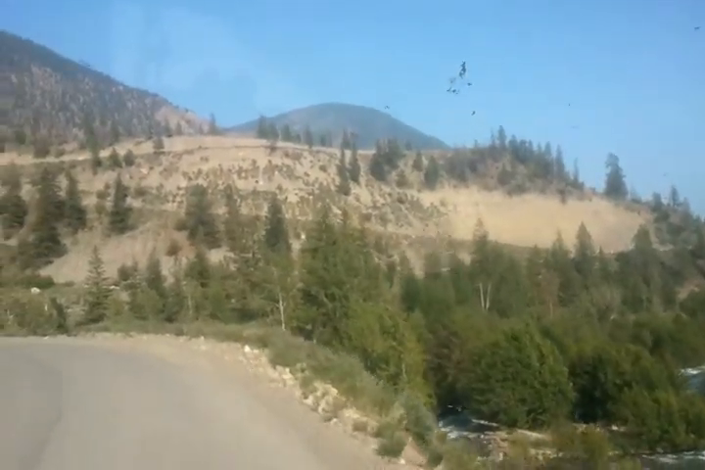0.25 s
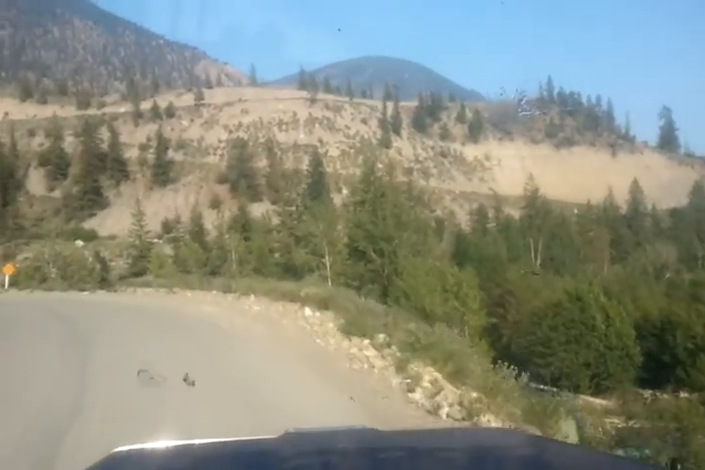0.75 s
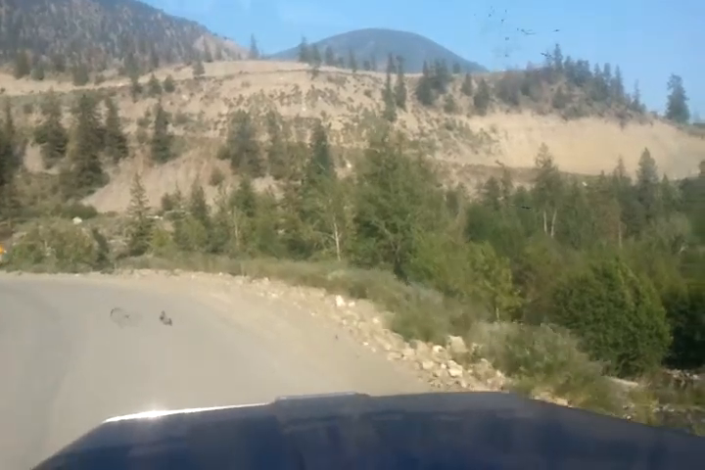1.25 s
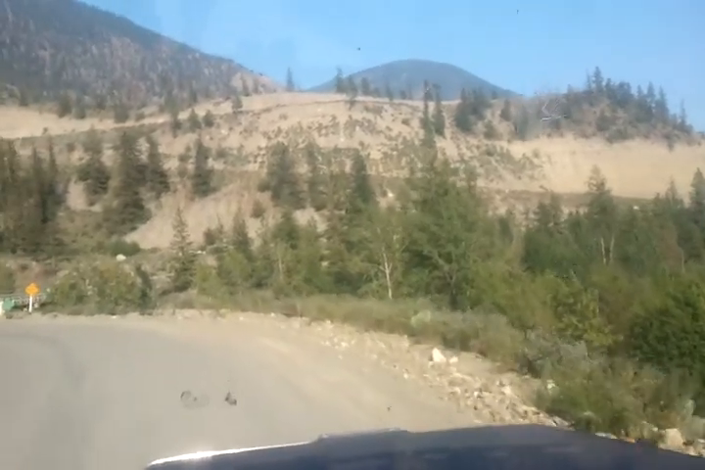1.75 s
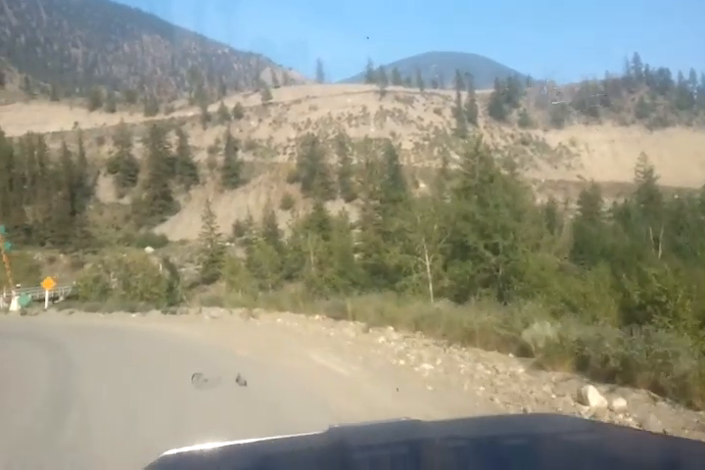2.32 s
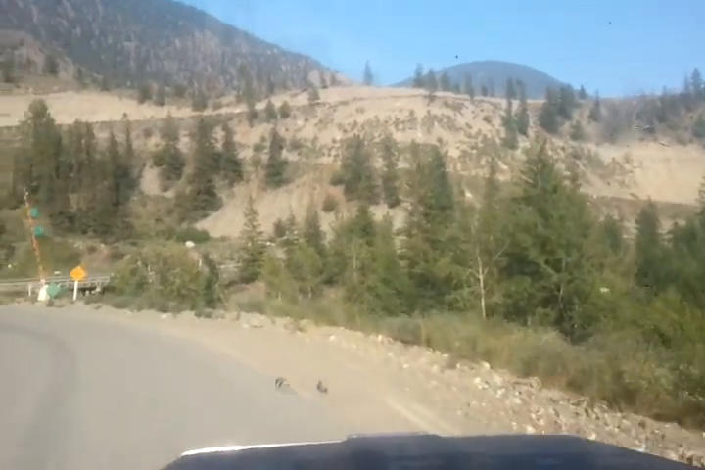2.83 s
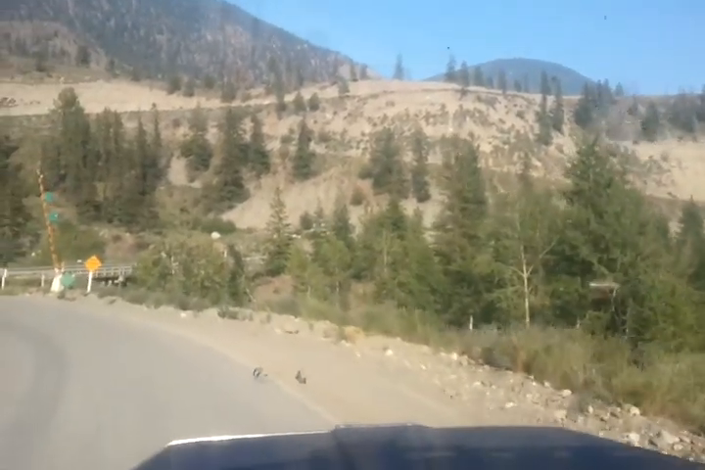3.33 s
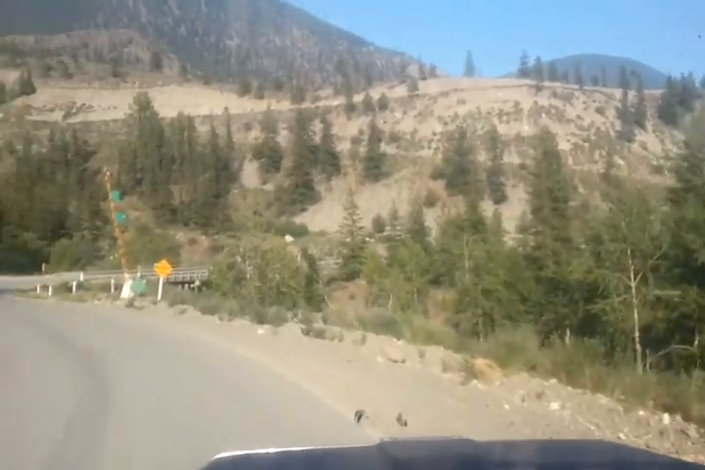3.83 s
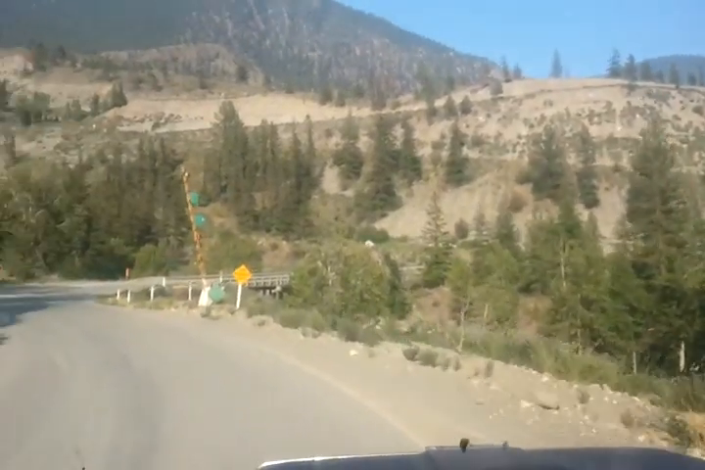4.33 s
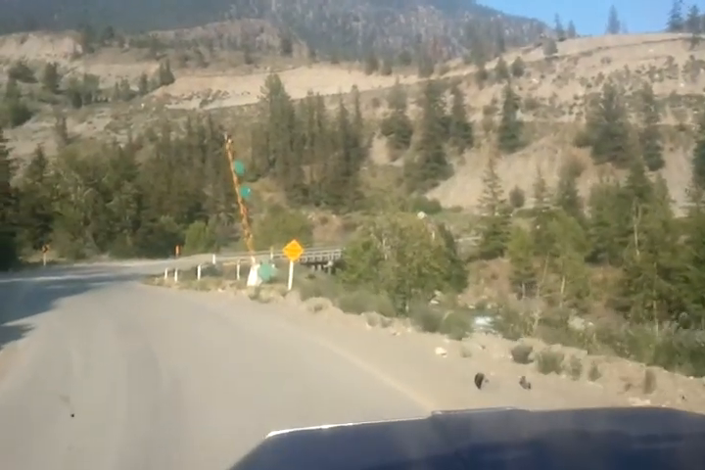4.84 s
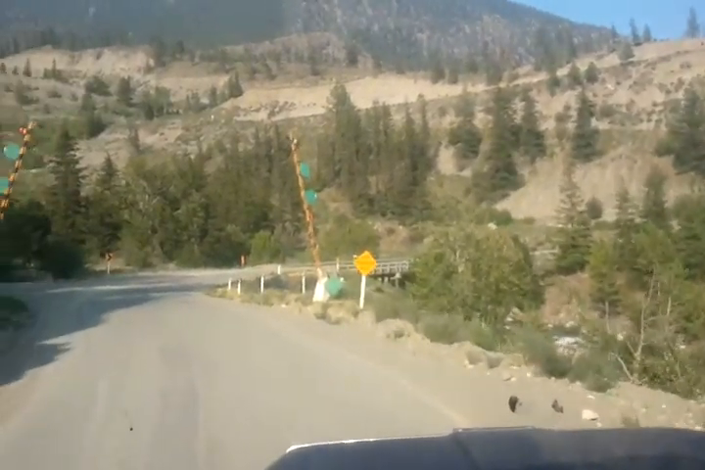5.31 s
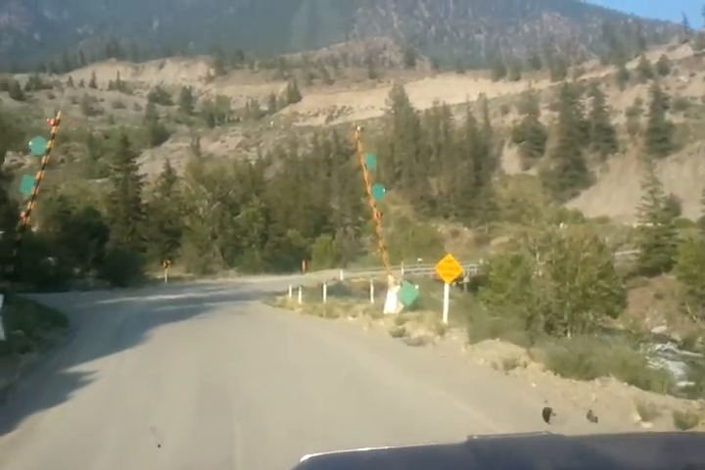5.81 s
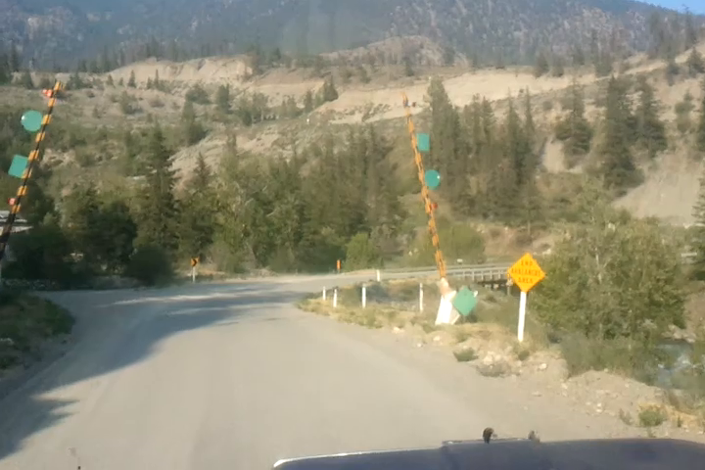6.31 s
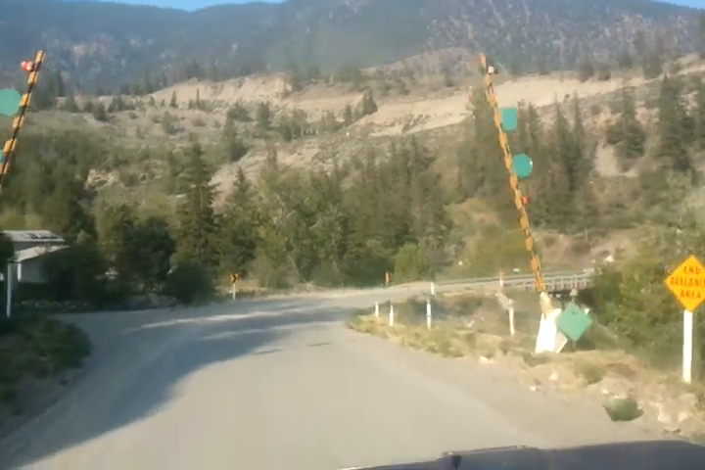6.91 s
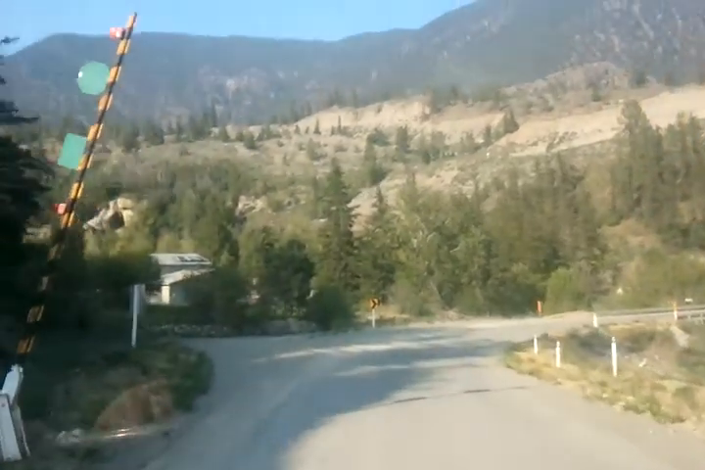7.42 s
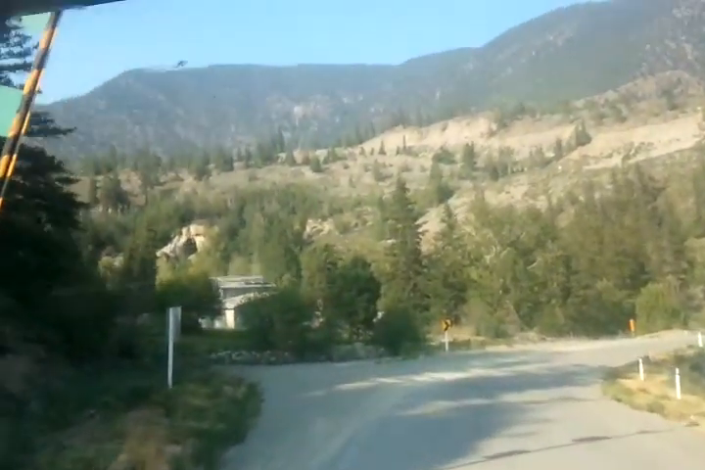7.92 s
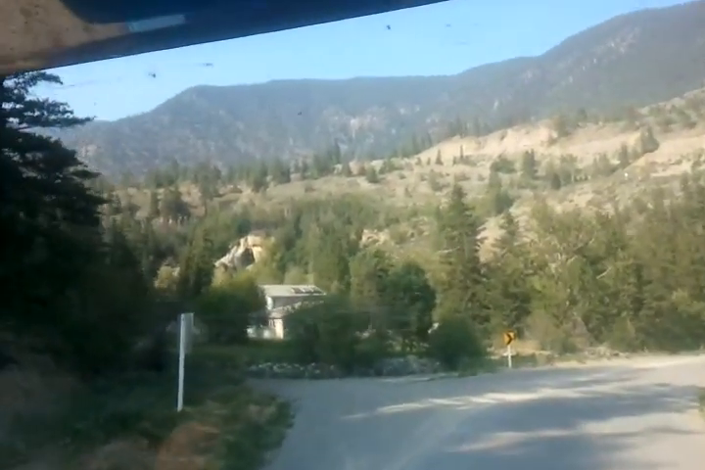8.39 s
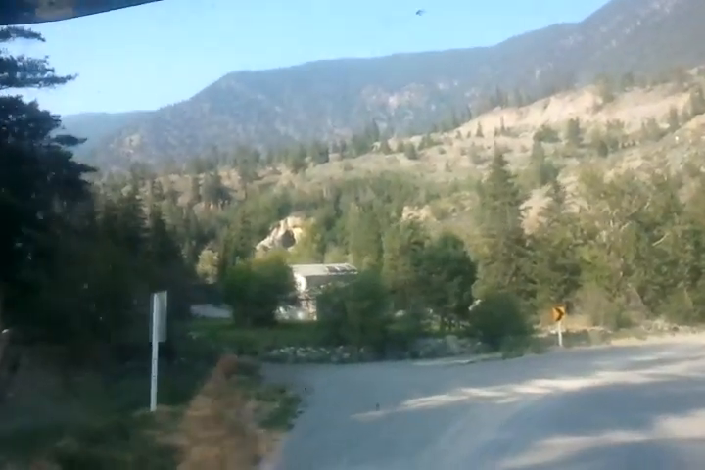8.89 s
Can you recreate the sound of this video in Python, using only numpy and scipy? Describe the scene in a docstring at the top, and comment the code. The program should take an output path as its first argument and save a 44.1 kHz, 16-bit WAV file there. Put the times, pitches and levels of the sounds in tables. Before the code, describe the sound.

A cheap, overloaded microphone in a truck cab catches a loud, throbbing, flattened diesel drone with metallic rattle and rushing air. One soft road bump comes early. Midway the throttle lifts: quieter rumble, mechanical clatter, thin gear whines and descending turbo whistle. Near the end, hard rail thuds and clanks accompany a short return of the engine roar, which then drops.

```python
"""A diesel exhaust booms until it clips: the cab of a six-cylinder truck under load, nearing a railway crossing.
The engine eases off; road rumble, clatter, gear whine and the slowing turbo come through.
The wheels thump and clank over the rails, the boom returns, then eases again.
One firing count times exhaust, rattle, clatter and timing gears; a load curve sets boom, drone and turbo.
Noise shaped in frequency makes rumble, jolts and air; fuzzy sines make the whines and panels."""
import sys
import numpy as np
from scipy import signal
from scipy.fft import rfft, irfft, next_fast_len
from scipy.io import wavfile
from scipy.ndimage import map_coordinates

SR = 44100
rng = np.random.default_rng(int(sys.argv[2]) if len(sys.argv) > 2 else 0)


def int16_out(signal):
    """Quantize to a 16-bit WAV file."""
    q = np.round(np.clip(np.atleast_2d(signal).T, -1, 1) * 32767)
    wavfile.write(sys.argv[1], SR, q.astype(np.int16))


N = 403515

# engine speed: (time [s], firing rate [1/s])
FIRING_RATE = [(0.0, 43.91), (0.3, 44.96), (1.0, 44.23), (2.0, 42.96), (3.0, 41.87), (4.0, 40.93),
               (4.9, 40.5), (5.6, 40.79), (6.4, 41.36), (7.2, 41.93), (8.3, 42.74), (8.6, 41.75),
               (9.15, 39.82)]
# cylinders in firing order; unevenness scales all but the rattle:
# (boom step [dB], drone step [dB], rattle step [dB], lateness [firing periods])
CYLINDER_STEPS = [(-1.5, -3, -15.5, .06), (-1, -12, -18.5, .03), (-3, 7.5, -0.5, .01), (0, -5.5, -7.5, .01),
                  (2.34, 2.5, -18, .03), (-1.6, 6.5, -3.5, .01)]
# gearbox whine: (time [s], pitch [Hz], level [dB])
GEARBOX_WHINE = [(0, 1110, -33), (5.1, 999.4, -34), (7, 1005, -32.5), (7.7, 1010, -43.5), (8.6, 1095, -42),
                 (9.1, 1095, -31)]
# road bump and rails: (time [s], thud level [dB], thud decay to -60 dB [s], metal clank level [dB])
JOLT_EVENTS = [(0.984, -8, .25, -24.5), (8.338, 2, .17, -14), (8.444, -9.5, 0.23, -25),
               (8.53, 2, 0.19, -4.5), (8.564, -7, 0.14, -14), (8.602, -8, .12, -10.5),
               (8.683, -6.5, 0.4, -18)]
# noise spectra, each rescaled to rms 1: (frequency [Hz], relative level [dB])
THUD_SPECTRUM = [(20, 0), (90, -7.5), (170, -1), (225, 3), (300, -1.5), (450, -10), (1100, -26.5),
                 (2500, -41), (8000, -42.5)]
RUMBLE_SPECTRUM = [(8, -31), (22, -10.5), (35, -2.5), (58, -7.5), (80, -0.5), (110, -6.5), (160, -8.5),
                   (205, -14.5), (260, -17.5), (400, -23.5), (700, -45.5), (2000, -81.5)]
CLATTER_SPECTRUM = [(100, -21.5), (280, 2.5), (450, 3), (540, -2), (680, -4.5), (830, 0), (1150, 0),
                    (1450, -4.5), (1650, -7), (2050, -7.5), (2700, -14.5), (3600, -16.5), (4700, -23.5),
                    (8000, -24.5)]
AIR_SPECTRUM = [(500, -41), (2500, 5), (4000, -1), (5200, -3.5), (6500, 2.5), (8000, -3.5)]
CLANK_SPECTRUM = [(400, -19.5), (800, -0.5), (1100, 1.5), (1350, -6), (1750, -17.5), (3500, -13.5),
                  (4500, -21.5), (8000, -38.5)]
# overtones of the firings: (multiple of firing rate, level within the drone [dB])
DRONE_OVERTONES = [(3, 0), (5, -11), (7, -16.5)]
# ringing cab panels: (pitch [Hz], fuzz width [Hz], level before the rumble gain [dB])
PANEL_TONES = [(198.8, 14, -14), (236.3, 14, -17), (369.6, 22, -16.5), (429.3, 30, -14), (485, 20, -22),
               (767, 36, -27.5), (853.5, 55, -29)]
# timing-gear whines: (multiple of firing rate, level [dB])
TIMING_MESHES = [(28, -43.5), (32, -43.5), (36, -36), (48, -46)]
# spells under load, the first already under way; drone and unevenness as at cruise speed:
# (start [s], end [s], boom [dB], cab drone [dB], cylinder unevenness [1], rumble [dB])
LOAD_SPELLS = [(-1, 4.925, 3.8, -10.5, .92, -13), (8.335, 8.96, 4.2, -8, .5, -10.5)]

TAKE_UP_S, LET_GO_S = .08, .125  # load ramps on and off
# eased off: values at the moment of easing, drone and unevenness as at cruise speed
EASED_BOOM_DB, EASED_DRONE_DB, EASED_UNEVEN, EASED_RUMBLE_DB = -16, -19.3, .25, -17
BOOM_DB_PER_S, DRONE_DB_PER_S = 3.1, 1.8  # after easing, the throttle creeps open again
CRUISE_FIRINGS_HZ = 42.5
DRONE_DB_PER_HZ, THROB_DB_PER_HZ = .5, .8  # per Hz of firing rate above cruise
CLATTER_DB, CLATTER_LOAD_DB = -23.8, 2.3  # eased off; rise under load
SPOOL_S = 1.4  # time constant of the turbo's lag
TURBO_IDLE_HZ, TURBO_FULL_HZ = 1620, 2020
WHISTLE_DB, WHISTLE_SPIN_DB = -45, -34  # idling; added at full spin
SPIN_POWER = 2.5  # turbo sound grows with this power of spin
AIR_DB, AIR_SPIN_DB, AIR_LOAD_DB = -58, -37, -26.3  # idling; added at full spin; under load
BAND_HZ, TOP_HZ = 8000, 15500  # recorder: steep roll-off, final cutoff


def amp(db):
    """Decibels to gain."""
    return 10 ** (np.asarray(db) / 20)


def unit(x):
    """Scale to rms 1."""
    return x / np.sqrt(np.mean(x ** 2) + 1e-20)


def curves(rows):
    """One value per sample for each column after the time."""
    s, *cols = np.transpose(rows)
    return [np.interp(np.arange(N) / SR, s, c) for c in cols]


def wobble(rate_hz):
    """A smooth random curve, rate_hz knots a second."""
    knots = rng.standard_normal(int(N * rate_hz / SR) + 4)
    return map_coordinates(knots, [np.arange(N) * rate_hz / SR])


def filtered(x, response):
    """Multiply the spectrum of x by a response of frequency."""
    size = next_fast_len(N + SR // 2)
    return irfft(rfft(x, size) * response(np.fft.rfftfreq(size, 1 / SR)), size)[:N]


def coloured(x, points):
    """x shaped by (frequency [Hz], level [dB]) points on a log axis, at rms 1."""
    f, db = np.transpose(points)
    return unit(filtered(x, lambda hz: amp(np.interp(np.log(hz + 1), np.log(f), db))))


def whine(hz, width_hz):
    """A fuzzy tone on a pitch curve: quadrature sines with random gains, at rms 1."""
    angle = 2 * np.pi * np.cumsum(hz) / SR
    return unit(wobble(width_hz) * np.sin(angle) + wobble(width_hz) * np.cos(angle))


def throttle():
    """The load (0-1), and the seconds since the engine last eased off."""
    t = np.arange(N) / SR
    load, eased_s = np.zeros((2, N))
    for start, end, *_ in LOAD_SPELLS:
        take_up = (t - start) / TAKE_UP_S
        let_go = 1 - (t - end) / LET_GO_S
        load += np.clip(np.minimum(take_up, let_go), 0, 1)
        eased_s = np.where(t > end, t - end, eased_s)
    return load, eased_s


def effort():
    """Boom dB, drone dB, unevenness, rumble dB: load carries each from eased to pulling."""
    load, eased_s = throttle()
    starts, _, *columns = np.transpose(LOAD_SPELLS)
    spell = np.searchsorted(starts, np.arange(N) / SR) - 1
    eased_boom_db = EASED_BOOM_DB + BOOM_DB_PER_S * eased_s
    eased_drone_db = EASED_DRONE_DB + DRONE_DB_PER_S * eased_s
    eased = eased_boom_db, eased_drone_db, EASED_UNEVEN, EASED_RUMBLE_DB
    return [(1 - load) * low + load * high[spell] for low, high in zip(eased, columns)]


def road(rumble_db):
    """Tyres rumble through the cab as wavering noise; its panels ring as fuzzy tones."""
    panels = sum(amp(db) * whine(np.full(N, hz), width) for hz, width, db in PANEL_TONES)
    rumble = amp(wobble(5.5)) * coloured(rng.standard_normal(N), RUMBLE_SPECTRUM)
    return amp(rumble_db) * (rumble + panels)


def jolts():
    """Each jolt thuds through the cab and makes loose metal clank: decaying noise."""
    attack_s, clank_t60_s = .001, .09
    thud, clank = np.zeros((2, N))
    for s, thud_db, thud_t60_s, clank_db in JOLT_EVENTS:
        age_s = np.maximum(np.arange(N) / SR - s, 0)
        rise = 1 - np.exp(-age_s / attack_s)
        thud += rise * amp(thud_db - 60 * age_s / thud_t60_s)
        clank += rise * amp(clank_db - 60 * age_s / clank_t60_s)
    thuds = thud * coloured(rng.standard_normal(N), THUD_SPECTRUM)
    return thuds + clank * coloured(rng.standard_normal(N), CLANK_SPECTRUM)


def turbo(load, width_hz=110, upper_ratio=1.93, upper_db=-8, upper_width_hz=330):
    """The turbo spins up and winds down behind the load, whistling and drawing air."""
    keep = np.exp(-1 / (SPOOL_S * SR))
    spin = 1 - signal.lfilter([1 - keep], [1, -keep], 1 - load)  # starts at full spin
    hz = TURBO_IDLE_HZ + (TURBO_FULL_HZ - TURBO_IDLE_HZ) * spin
    boost = np.abs(spin) ** SPIN_POWER
    whistle = whine(hz, width_hz) + amp(upper_db) * whine(upper_ratio * hz, upper_width_hz)
    air = coloured(rng.standard_normal(N), AIR_SPECTRUM)
    whistle_gain = amp(WHISTLE_DB) + amp(WHISTLE_SPIN_DB) * boost
    air_gain = amp(AIR_DB) + amp(AIR_SPIN_DB) * boost
    eased = whistle_gain * whistle + air_gain * air
    # under load the rush of air takes the place of the whistle
    return (1 - load) * eased + load * amp(AIR_LOAD_DB) * air


def whines(firing_hz, mesh_width_hz=42):
    """Meshing teeth whine: gearbox on its own pitch curve, timing gears at multiples of firing rate."""
    gear_hz, gear_db = curves(GEARBOX_WHINE)
    gearbox = amp(gear_db) * whine(gear_hz, width_hz=34)
    timing = sum(amp(db) * whine(k * firing_hz, mesh_width_hz) for k, db in TIMING_MESHES)
    return gearbox + timing


def clatter(firings, load, knock_db=-4, t60_s=0.15, pulsing=0.067):
    """Each cylinder knocks with its own ring, over the pulsing noise of valves and gears."""
    starts = np.flatnonzero(np.diff(np.floor(firings)) > 0)
    t = np.arange(SR // 8) / SR
    knocks, count = np.zeros(N), len(CYLINDER_STEPS)
    for k in range(count):
        own_starts = starts[k::count]
        blows = np.zeros(N)
        blows[own_starts] = amp(0.5 * rng.standard_normal(len(own_starts)))
        ring = rng.standard_normal(len(t)) * amp(-60 * t / t60_s)
        knocks += signal.fftconvolve(blows, ring)[:N]
    wash = rng.standard_normal(N) * (1 + pulsing * np.sin(2 * np.pi * firings))
    clatter_db = CLATTER_DB + CLATTER_LOAD_DB * load
    return amp(clatter_db) * coloured(wash + amp(knock_db) * unit(knocks), CLATTER_SPECTRUM)


def rattle(firings, boom_db, rattle_db=-16.0, stroke_periods=.44, decay_db_per_period=110):
    """Metal knocks as the boom swings back, as strong as the boom, hardest on two cylinders."""
    blow, age_periods = np.divmod(firings - stroke_periods, 1)
    blow = blow.astype(int)
    scatter_db = 1.7 * rng.standard_normal(N)[blow]
    force_db = np.array(CYLINDER_STEPS)[blow % len(CYLINDER_STEPS), 2] + scatter_db
    level_db = rattle_db + boom_db + force_db - decay_db_per_period * age_periods
    return amp(level_db) * coloured(rng.standard_normal(N), CLANK_SPECTRUM)


def exhaust(firings, boom_db, drone_db, uneven, shake_db=-14.5, scatter_db=0.74, lead_periods=0.06):
    """One pressure swing per firing; its overtones drone in the cab and steepen each swing."""
    count = len(CYLINDER_STEPS)
    # unequal cylinders throb once every two turns of the crank
    boom_step, drone_step, _, late = [np.interp(firings, np.arange(count) + .5, column, period=count)
                                      for column in np.transpose(CYLINDER_STEPS)]
    swings = firings - uneven * late
    boom = amp(uneven * boom_step + scatter_db * wobble(30)) * np.sin(2 * np.pi * swings)
    twice_a_turn = np.sin(2 * np.pi * firings * 2 / 3)  # three firings a turn
    # the sharp part of each blow arrives a little ahead of the boom
    early = swings + lead_periods
    overtones = sum(amp(db) * np.sin(2 * np.pi * k * early) for k, db in DRONE_OVERTONES)
    drone = amp(drone_db + uneven * drone_step + 0.4 * wobble(12)) * overtones
    return amp(boom_db) * (boom + amp(shake_db) * twice_a_turn) + drone


def scene():
    """Sum of road, jolts and engine; firings time the engine, load sets its effort."""
    firing_hz, = curves(FIRING_RATE)
    firings = np.cumsum(firing_hz) / SR
    load, _ = throttle()
    boom_db, drone_db, uneven, rumble_db = effort()
    over_hz = firing_hz - CRUISE_FIRINGS_HZ
    drone_db = drone_db + DRONE_DB_PER_HZ * over_hz
    uneven = uneven * amp(THROB_DB_PER_HZ * over_hz)
    background = road(rumble_db) + jolts()
    machinery = turbo(load) + whines(firing_hz) + clatter(firings, load)
    pipe = rattle(firings, boom_db) + exhaust(firings, boom_db, drone_db, uneven)
    return (background + machinery + pipe)[None]


def record(dry, ripple=0.001, floor_db=-51):
    """The overloaded microphone clips the boom flat, masking the rest at its peaks; narrow band."""
    ceiling = .705
    # a faint noise floor stays under the clipped peaks
    clipped = np.clip(dry[0], -ceiling, ceiling) + amp(floor_db) * rng.standard_normal(N)
    narrow = filtered(clipped, lambda hz: 1 / np.sqrt(1 + (hz / BAND_HZ) ** 60))
    # shaving the filter's overshoots leaves faint ticks in the treble
    held = np.clip(narrow, -ceiling - ripple, ceiling + ripple)
    return filtered(held, lambda hz: hz < TOP_HZ)[None]


dry = scene()
out = record(dry)
int16_out(out)
```